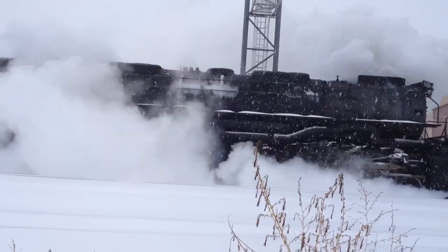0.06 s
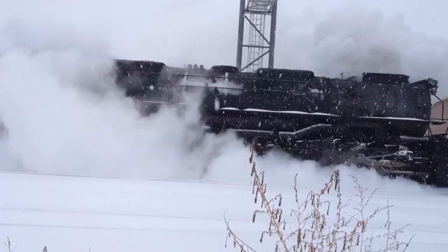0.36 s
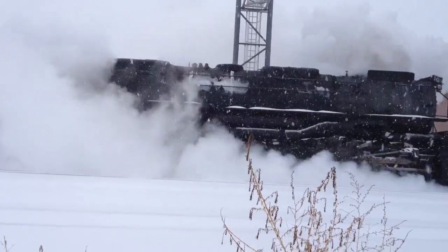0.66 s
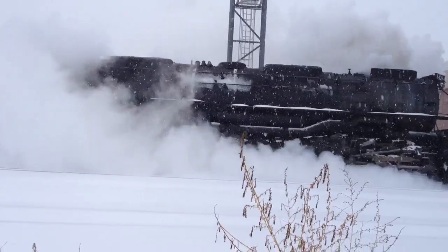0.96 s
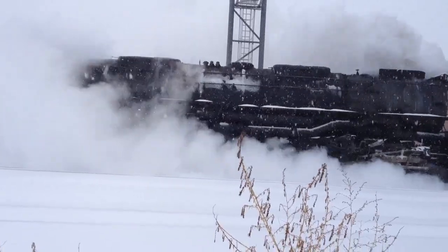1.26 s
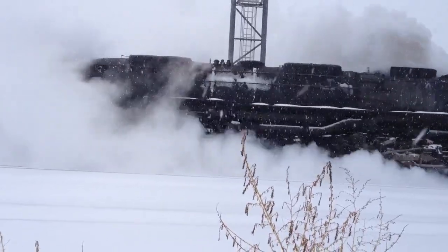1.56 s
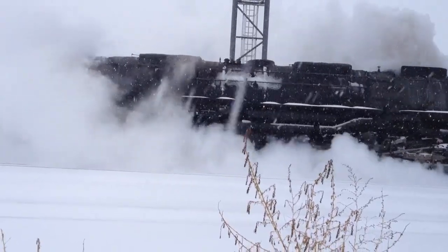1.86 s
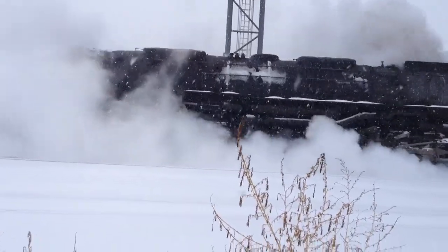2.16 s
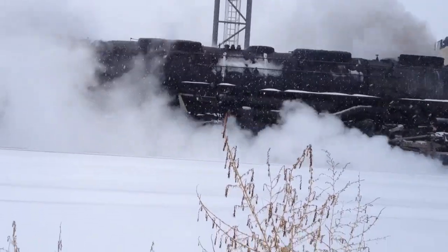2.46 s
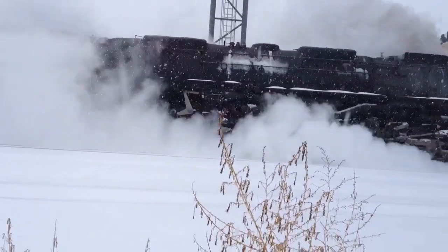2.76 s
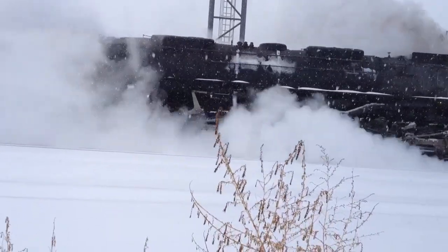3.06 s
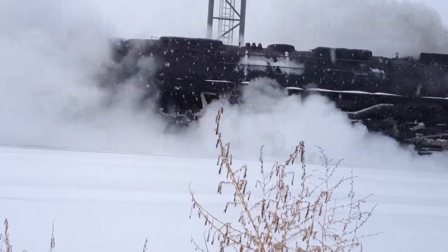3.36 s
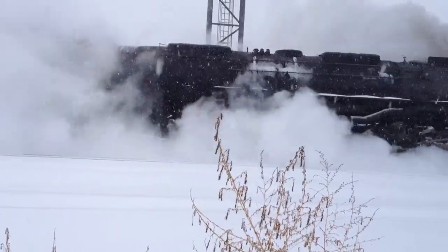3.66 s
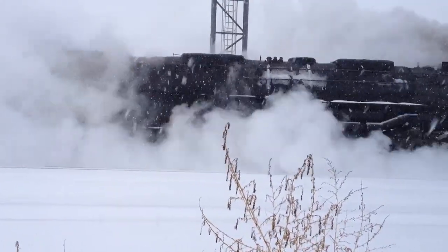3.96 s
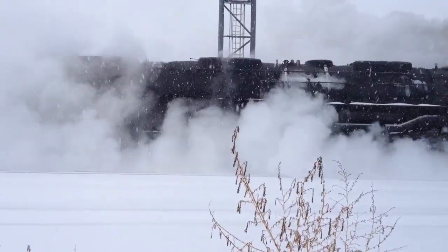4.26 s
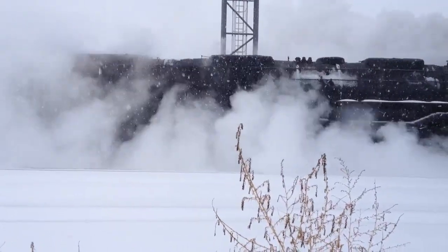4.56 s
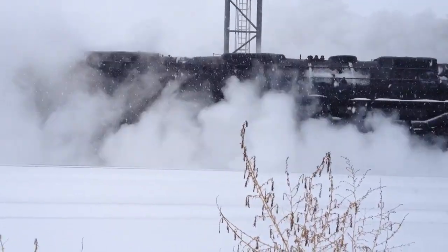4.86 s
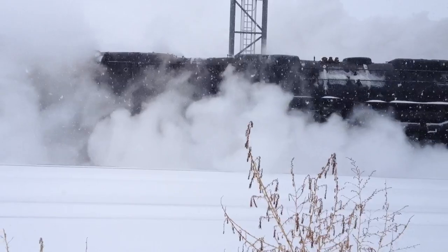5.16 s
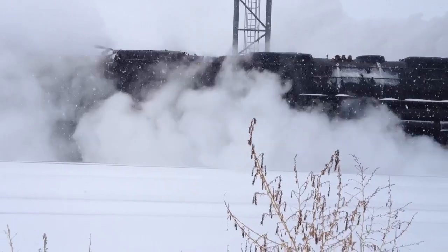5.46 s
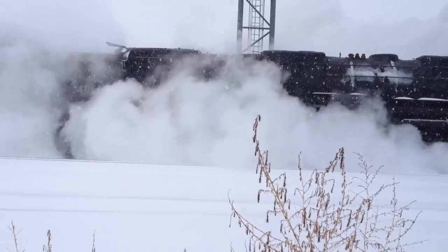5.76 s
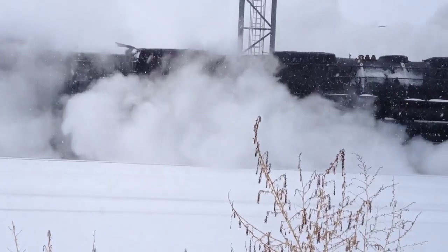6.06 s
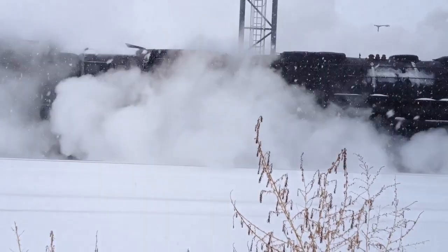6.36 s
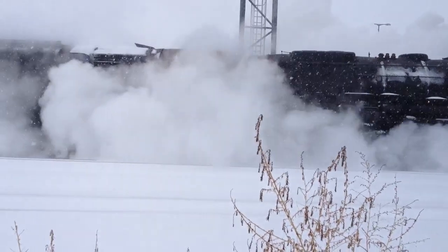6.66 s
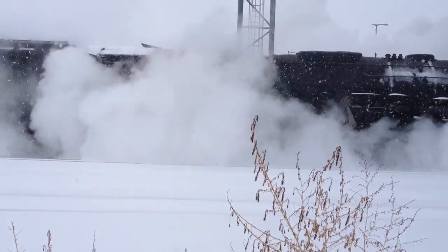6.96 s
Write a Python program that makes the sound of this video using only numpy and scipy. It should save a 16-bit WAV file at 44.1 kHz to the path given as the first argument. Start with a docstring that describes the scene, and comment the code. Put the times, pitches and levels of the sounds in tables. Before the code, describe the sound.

Two short, deep chords from a steam train whistle, followed by waves of hissing, roaring steam as the engine moves off.

```python
"""A steam locomotive's deep chime whistle ends one blast and gives a second, sagging as the valve closes.
Steam across the lips sounds a five-note chord; the snowy yard returns dull echoes.
As the engine pulls slowly out, open cylinder cocks blow a surge of steam with each piston stroke,
over a faint generator whine and a few dull thumps. Heard from the lineside."""
import sys
import numpy as np
from scipy import signal
from scipy.fft import rfft, irfft
from scipy.io import wavfile
from scipy.ndimage import uniform_filter1d

SR = 44100
rng = np.random.default_rng(int(sys.argv[2]) if len(sys.argv) > 2 else 0)


def generate_wav(signal):
    """Clip the signal to [-1, 1] and save it as 16-bit WAV at the path in sys.argv[1]."""
    frames = np.transpose(np.atleast_2d(signal))
    scaled = np.clip(frames, -1, 1) * 32767
    pcm = np.round(scaled).astype(np.int16)
    wavfile.write(sys.argv[1], SR, pcm)


N = 309141


def amp(db):
    return 10 ** (np.asarray(db) / 20)


def unit_rms(x):
    return x / np.sqrt(np.mean(x ** 2) + 1e-20)


def log_interp(points, hz):
    """Value of (frequency, value) points at hz, on a log-frequency axis."""
    point_hz, value = np.transpose(points)
    return np.interp(np.log(hz + 1), np.log(point_hz + 1), value)


def add(mix, start_s, sound):
    part = mix[max(round(start_s * SR), 0):][:len(sound)]
    part += sound[:len(part)]


def noise(spectrum, size):
    """Noise of rms 1, shaped by (frequency [Hz], level [dB]) points."""
    hz = np.fft.rfftfreq(size, 1 / SR)
    return unit_rms(irfft(rfft(rng.standard_normal(size)) * amp(log_interp(spectrum, hz)), size))


def wander(rate_hz, size):
    """Random drift, rms about 1, rolling off above rate_hz."""
    t = np.arange(8000) / 1000
    hz = np.fft.rfftfreq(len(t), t[1])
    drift = unit_rms(irfft(rfft(rng.standard_normal(len(t))) / (1 + (hz / rate_hz) ** 4)))
    return np.interp(np.arange(size) / SR, t, drift)


def patches(shape, frames, bins=1):
    """Random time-frequency patches of rms 1, about frames by bins in size."""
    smoothed = uniform_filter1d(rng.standard_normal(shape), frames, 0)
    return unit_rms(uniform_filter1d(smoothed, bins, 1))


def whine_and_squeal_echo(waver=0.0031, flutter=0.39):
    """Faint generator whine (613 Hz) and the whistle's high squeal lingering as an echo (1302 Hz)."""
    # tones: (frequency [Hz], peak time [s], peak level [dB], fade either side [dB/s])
    tones = [(613, 6, -45, 1.25), (1302, 2.1, -39.5, 8)]
    out, t = np.zeros(N), np.arange(N) / SR
    for hz, peak_s, db, fade_db_per_s in tones:
        phase = 2 * np.pi * np.cumsum(hz * (1 + waver * wander(18, N))) / SR
        level = amp(db - fade_db_per_s * abs(t - peak_s))
        out += np.sqrt(2) * level * np.sin(phase) * (1 + flutter * wander(13, N))
    return out


def thumps(rise_s=0.012, low_cut_hz=70):
    """Short, soft pulses of bass noise with no ring."""
    # thumps: (time [s], peak before the low cut [dB], body frequency [Hz])
    hits = [(3.734, -31, 179), (3.797, -37, 178), (3.875, -33, 154), (3.914, -33.5, 197), (3.974, -41, 218),
            (4.069, -34, 171), (4.097, -46, 141), (4.504, -37, 153), (4.58, -36, 203), (4.854, -41, 196),
            (5.385, -34, 196), (5.433, -37.5, 161), (5.556, -34, 200), (5.637, -33, 183)]
    out, t = np.zeros(N), np.arange(SR // 5) / SR
    for start_s, db, hz in hits:
        spectrum = [(hz / 5, -30), (hz * 0.87, -4), (hz, 0),
                    (hz * 1.07, -6), (hz * 3.3, -24), (hz * 10, -70)]
        pulse = noise(spectrum, len(t)) * t / rise_s * np.exp(-t / rise_s)
        add(out, start_s, amp(db) * pulse / abs(pulse).max())
    return signal.sosfilt(signal.butter(2, low_cut_hz, "high", fs=SR, output="sos"), out)


def cylinder_cocks(t, roar_db, leak_db=(7.5, -0.5, -8), sizzle_db=-1.5, fizz_db=-8.5, sizzle_share=0.53):
    """Hiss, sizzle and fizz levels [dB]: piston-stroke surges over a leak that follows the roar."""
    # steam surges: (start [s], rise [s], hold [s], decay [s], level [dB], brightness [dB])
    surges = [(-.1, 0.076, 0.73, 0.11, -28.5, 0), (0.196, .07, .155, .03, -27.5, 6.5),
              (0.918, 0.025, 0.26, 0.096, -25, -5), (1.12, 0.42, 0.16, .2, -31.5, 8),
              (1.763, .3, 0.49, .55, -20, 0.5), (2.122, 0.18, 0.09, 0.18, -33, 12),
              (2.771, 0.038, 0.26, .025, -22.5, 4.5), (3.02, 0.16, .095, 0.034, -26, 1.5),
              (4.06, .48, 0.087, 0.058, -17, -4), (4.295, 0.041, 0.053, 0.069, -27, 10.5),
              (4.608, .1, 0.2, 0.063, -20.5, -2.5), (4.8, 0.069, 0.03, 0.019, -19, 0),
              (4.964, 0.15, 0.37, .1, -20.5, -6), (5.553, 0.061, 0.089, .06, -26, -7),
              (6.083, 0.29, .14, 0.098, -20.5, -7), (6.57, 0.056, 0.036, 0.85, -17, -7),
              (6.596, 0.11, 0.16, 0.038, -25, 6.5)]
    power = amp(np.add.outer(leak_db, roar_db)) ** 2
    for start_s, rise_s, hold_s, decay_s, db, bright_db in surges:
        age = t - start_s
        flow = np.clip(age / rise_s, 0, 1) * np.exp(-np.maximum(age - rise_s - hold_s, 0) / decay_s)
        band_gains = amp(db + np.array([0, sizzle_db + sizzle_share * bright_db, fizz_db + bright_db]))
        power += np.outer(band_gains, flow) ** 2
    return 10 * np.log10(power)


def steam(joint_hz=1600, jet_share=0.17, eddy_db=1, drift_db=1, sputter_db=0.56, gust_db=1.12):
    """Turbulent jets: small eddies at the nozzles give treble, large ones in the cloud roar and rumble."""
    # roar of the spreading cloud: (time [s], level [dB])
    cloud = [(.2, -37.5), (1.65, -37), (2.15, -31), (2.9, -33), (3.2, -38.5), (3.58, -37), (3.85, -33.5),
             (4.5, -31), (5.05, -36), (5.7, -34.5), (6.6, -29.5), (6.92, -35)]
    # cloud spectrum: (frequency [Hz], relative density [dB])
    roar_spectrum = [(20, -52), (50, -46), (80, -37), (120, -27), (175, -12.5), (250, -12), (380, -13.5),
                     (480, -8.5), (700, 0), (1000, 4.5), (1600, -0.5)]
    # jet spectrum: (frequency [Hz], relative density [dB])
    hiss_spectrum = [(1500, 1.5), (2000, 0.5), (2600, 0), (3500, -1), (4450, -1), (4800, -5), (5250, -6.5),
                     (6100, -5.5), (7400, -9), (8500, -11), (9600, -13), (12400, -17.5), (15300, -23.5)]
    # passing jet resonances: (mid time [s], length [s], frequency [Hz], width [Hz], boost [dB])
    resonances = [(1.207, 0.1, 3540, 300, 8), (1.58, 0.24, 3120, 250, 10), (1.895, 1.1, 7440, 720, 3.5),
                  (2.783, 0.68, 2430, 350, 5), (3.1, 0.73, 4330, 795, 4.5), (3.023, 0.24, 5460, 2400, 6),
                  (5.3, 0.58, 6600, 1600, 4.5)]
    hz, t = np.fft.rfftfreq(1024, 1 / SR), np.arange(N // 256 + 5) * 256 / SR
    low_db = log_interp(roar_spectrum, hz) - log_interp(roar_spectrum, joint_hz)
    high_db = log_interp(hiss_spectrum, hz) - log_interp(hiss_spectrum, joint_hz)
    base_db = np.where(hz < joint_hz, low_db, high_db)

    roar_db = np.interp(t, *np.transpose(cloud))
    hiss_db, sizzle_db, fizz_db = cylinder_cocks(t, roar_db)
    rumble_db = roar_db + jet_share * (sizzle_db - roar_db)  # a hard jet shakes the cloud
    drives_db = [rumble_db - 11, roar_db + 3, hiss_db + 3, sizzle_db + 3, fizz_db + 3]
    bands_hz = [(200, 500), (600, 1700), (2200, 4800), (5200, 8500), (9500, 15000)]
    centres_hz = np.sqrt(np.prod(bands_hz, axis=1))
    field_db = np.tile(base_db, (len(t), 1))
    for (lo, hi), drive_db, weights in zip(bands_hz, drives_db, np.eye(len(bands_hz))):
        band_db = 10 * np.log10(np.sum(amp(base_db[(hz > lo) & (hz < hi)]) ** 2))
        field_db += np.outer(drive_db - band_db, log_interp(np.c_[centres_hz, weights], hz))
    for mid_s, length_s, tone_hz, width_hz, db in resonances:
        swell = np.exp(-(2 * (t - mid_s) / length_s) ** 2)
        peak = np.exp(-(2 * (hz - tone_hz) / width_hz) ** 2)
        field_db += db * np.outer(swell, peak)

    field_db += eddy_db * patches(field_db.shape, frames=8, bins=16)
    field_db += drift_db * patches(field_db.shape, frames=80, bins=4)  # colour shifts as the engine moves
    treble = np.sqrt(hz / 6000)
    field_db += sputter_db * patches((len(t), 1), frames=2) * treble  # water in the steam
    field_db += gust_db * patches((len(t), 1), frames=12) * treble
    real, imag = rng.standard_normal((2, *field_db.shape))
    spectra = (real + 1j * imag) * amp(field_db)
    return signal.istft(spectra.T, nperseg=1024, noverlap=768)[1][:N] * np.sqrt(2 / 3)


def yard_echoes(x, band_hz=(200, 520), drift_s=0.00081, drift_hz=5, paths=4):
    """Buildings and wagons scatter late clusters back; snow absorbs the treble."""
    # reflections: (delay [s], spread [s], level [dB])
    echoes = [(.04, 0.047, -12), (.29, 0.16, -17), (0.701, 0.092, -19.5)]
    t, samples = np.arange(2 * SR) / SR, np.arange(len(x))
    dull = signal.sosfilt(signal.butter(2, band_hz, "band", fs=SR, output="sos"), x)
    out = np.zeros(len(x))
    for delay_s, spread_s, db in echoes * paths:
        age = np.maximum(t - delay_s, 0) / spread_s
        cluster = rng.standard_normal(len(t)) * np.sqrt(age) * np.exp(-age)
        echo = signal.fftconvolve(dull, amp(db) * cluster / np.linalg.norm(cluster))[:len(x)]
        # moving air shifts each path, so the echoes beat
        out += np.interp(samples + drift_s * SR * wander(drift_hz, len(x)), samples, echo)
    return out / np.sqrt(paths)


def squeal(start_s=0.86, length_s=0.17, waver=0.0028):
    """As the valve cracks open, the first steam sounds only the whistle's high modes."""
    # high modes: (frequency [Hz], level [dB])
    modes = [(1320, -36.5), (2152, -37.5), (2620, -36)]
    size, out = round(length_s * SR), np.zeros(N)
    for hz, db in modes:
        phase = 2 * np.pi * np.cumsum(hz * (1 + waver * wander(45.5, size))) / SR
        add(out, start_s, np.sqrt(2) * amp(db) * np.sin(phase) * signal.windows.tukey(size, 0.5))
    return out


def blast(t, hold_s, ease_s, length_s, opening, choke_db, jitter=0.0069, flutter=0.1, roughness=0.45):
    """Chime chord: pitch, overtones and rush follow the valve; turbulence roughens the overtones."""
    # chimes: (nominal pitch [Hz], bend exponent, level [dB], open-valve gain [dB],
    #          overtone level [dB], rise [s], ring-down [s])
    chimes = [(222.1, 0.028, -14.3, -3, -6, 0.06, 0.024), (244, .5, -33, 0, -6, .015, 0.025),
              (260, .3, -19.5, -2, -7.5, .016, .016), (288.7, .55, -35.5, 1, -9, .02, .015),
              (349, 0.96, -26, 3.5, 0.5, 0.033, 0.02)]
    # overtone spectrum: (frequency [Hz], level [dB])
    overtones = [(430, -4.5), (560, -1.5), (680, -4.5), (850, 0), (1100, -9), (1400, -14.5), (2200, -14),
                 (3600, -19), (6000, -36)]
    # steam rush, with a low overload rumble under the blast: (frequency [Hz], relative density [dB])
    rush_and_rumble = [(20, -25), (45, -25), (70, -18), (100, -8), (150, -3.5), (280, 16), (420, 2),
                       (800, 5.5), (1100, 8), (1500, 2), (2300, -17), (3800, -9), (6000, -23), (14000, -23)]
    open_hz, eased_hz, reference_hz = 352.7, 317.6, 350
    cold_hz, warm_s = 31.96, 0.065  # a cold bell starts flat

    def envelope(rise_s, decay_s):
        return np.minimum(t / rise_s, 1) * np.exp(-np.maximum(t - length_s, 0) / decay_s)

    valve = opening * np.clip(1 - (t - hold_s) / ease_s, 0, 1)  # 1 wide open, 0 half shut
    pitch_ratio = (eased_hz + (open_hz - eased_hz) * valve - cold_hz * np.exp(-t / warm_s)) / reference_hz
    flow = envelope(rise_s=0.017, decay_s=0.012)
    brightness = amp(-28 + 8.5 * valve) * flow
    overblow_db = choke_db * valve * np.minimum(t / hold_s, 1) ** 3  # low chime only
    overshoot_db = 8 * np.exp(-(t / 0.04) ** 2)  # upper chimes, until the low one speaks
    out = amp(-35.5 + 15 * valve) * flow * noise(rush_and_rumble, len(t))
    for index, (hz, bend, db, open_db, upper_db, rise_s, ring_s) in enumerate(chimes):
        pitch_hz = hz * pitch_ratio ** bend * (1 + jitter * wander(42, len(t)))
        phase = 2 * np.pi * (np.cumsum(pitch_hz) / SR + rng.random())
        level_db = db + open_db * valve + (overshoot_db if index else overblow_db)
        level = amp(level_db) * envelope(rise_s, ring_s)
        out += np.sqrt(2) * level * np.sin(phase) * (1 + flutter * wander(30, len(t)))
        for k in range(2, 16):
            gain = amp(upper_db + log_interp(overtones, k * hz)) * brightness
            swell = 1 + roughness * wander(41, len(t))
            out += gain * swell * np.sin(k * phase + 2 * np.pi * rng.random())
    return out


def whistle():
    """Two blasts with echoes; the first is already sounding at time zero."""
    # valve pulls: (start [s], hold [s], ease-back [s], length [s], opening [0-1], low-chime choke [dB])
    pulls = [(-.62, .67, .09, 0.736, .7, 0.5), (0.95, .258, .135, 0.554, 0.99, -8)]
    out = np.zeros(N + SR)  # 1 s lead-in
    for start_s, *pull in pulls:
        add(out, start_s + 1, blast(np.arange(SR) / SR, *pull))
    return (out + yard_echoes(out))[SR:]


def scene():
    """All sources centred."""
    mono = squeal() + whistle() + steam() + whine_and_squeal_echo() + thumps()
    return np.array([mono, mono])


def record(dry, knee_up=0.39, knee_down=0.85, headroom=0.16, cutoff_hz=15450):
    """Soft overload, positive peaks first, then a low-pass."""
    linear = np.clip(dry, -knee_down, knee_up)
    squashed = linear + headroom * np.tanh((dry - linear) / headroom)
    lowpass = signal.firwin(801, cutoff_hz, window=("kaiser", 9), fs=SR)
    return signal.oaconvolve(squashed, lowpass[None], "same", axes=1)


dry = scene()
out = record(dry)
generate_wav(out)
```